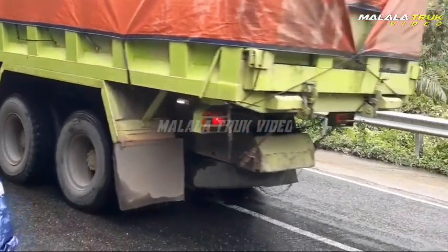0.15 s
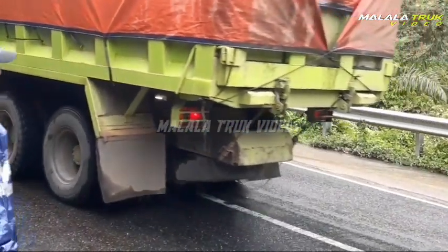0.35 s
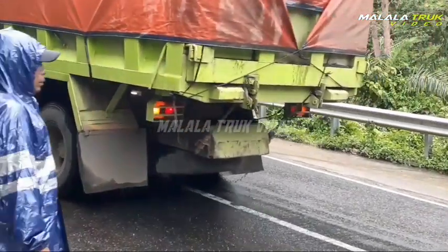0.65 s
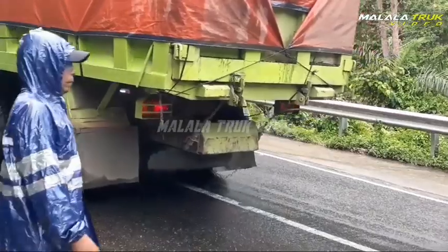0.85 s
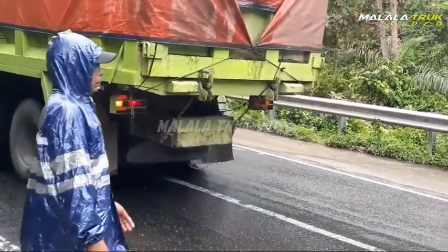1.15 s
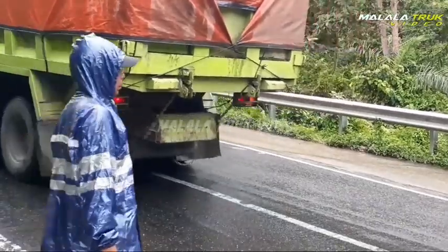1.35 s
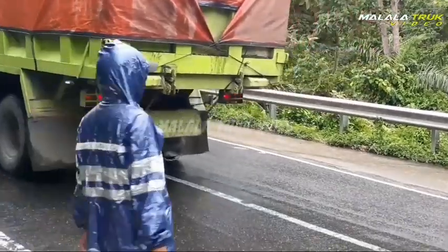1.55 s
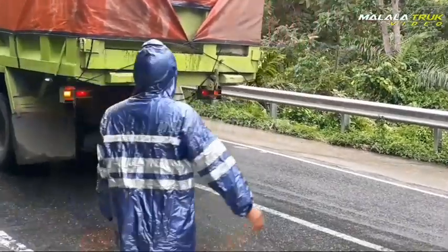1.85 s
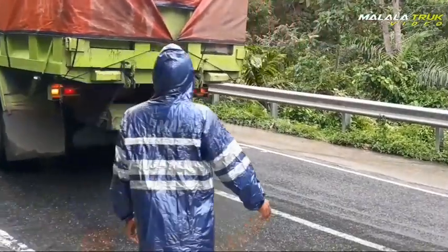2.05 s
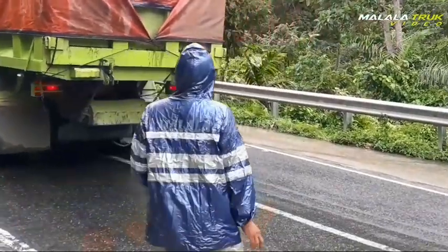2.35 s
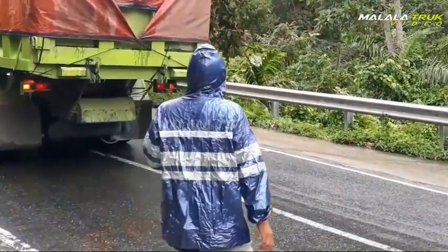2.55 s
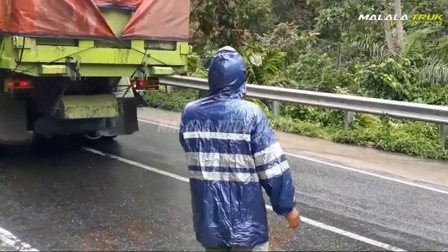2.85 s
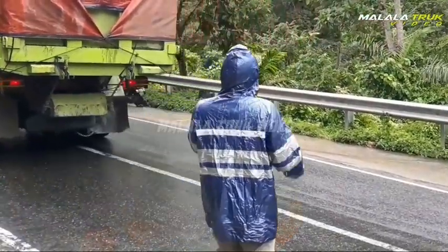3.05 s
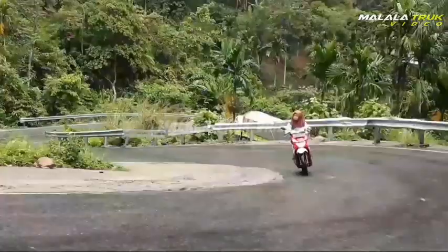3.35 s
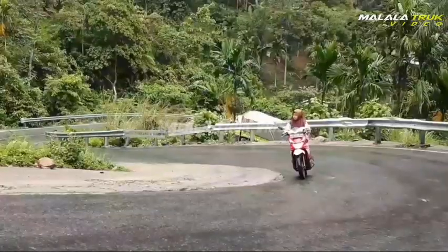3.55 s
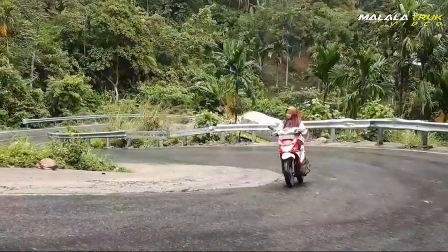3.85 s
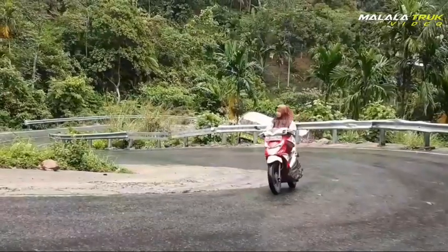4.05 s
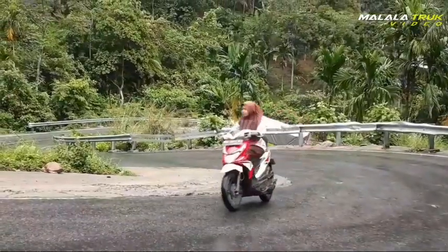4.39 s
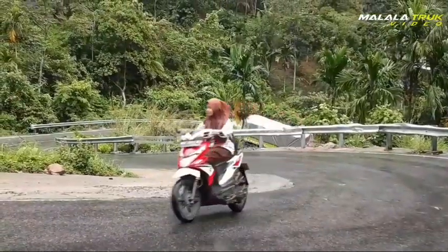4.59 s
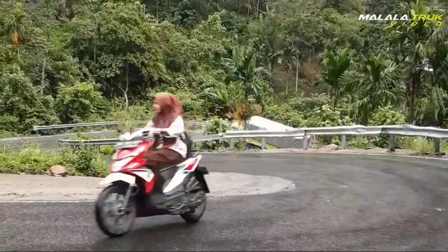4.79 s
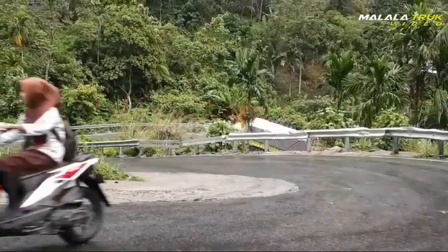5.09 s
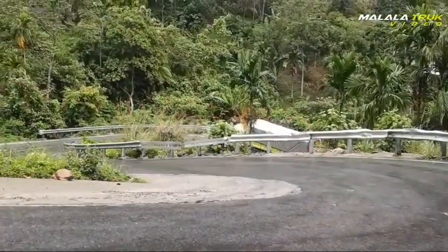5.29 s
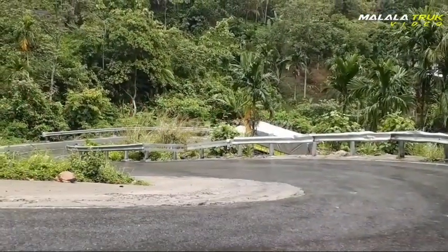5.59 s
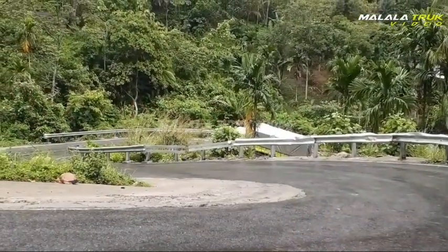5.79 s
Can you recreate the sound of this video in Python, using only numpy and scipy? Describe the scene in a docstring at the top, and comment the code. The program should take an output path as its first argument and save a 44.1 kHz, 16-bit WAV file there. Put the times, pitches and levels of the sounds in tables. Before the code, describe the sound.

Outdoors on a wet hill road, a heavy diesel truck grinds slowly away, close to a stereo microphone: deep steady boom, metallic clatter, wet tyre hiss and one short shrill squeal midway. The sound cuts abruptly to a much quieter scooter, puttering nearer with a soft hum, ticking and spray, passing very close near the end, while an insect rasps faintly in the bushes.

```python
"""Truck on a wet hill road, then a scooter

A loaded six-cylinder diesel truck grinds uphill close by: firing pulses, ringing panels, wet tyre hiss, one squeal.
The scene cuts abruptly to a single-cylinder scooter that rounds the bend and passes within a metre and a half:
exhaust pulses shaped by a silencer, cyclic knocks, spray and a wheel hiss that falls in pitch.
An insect throbs in the bushes. Two microphones stand about a hand's length apart."""
import sys
import numpy as np
from scipy import signal
from scipy.fft import rfft, irfft
from scipy.io import wavfile
from scipy.ndimage import map_coordinates

SR = 44100
rng = np.random.default_rng(int(sys.argv[2]) if len(sys.argv) > 2 else 0)


def int16_out(signal):
    """Quantize to a 16-bit WAV file."""
    q = np.round(np.clip(np.atleast_2d(signal).T, -1, 1) * 32767)
    wavfile.write(sys.argv[1], SR, q.astype(np.int16))


N = 261506
T = np.arange(N) / SR
HZ = np.fft.rfftfreq(N, 1 / SR)
CUT_S = 3.328  # the truck gives way to the scooter
EDGE_HZ = 15550  # upper band limit of the recorder

# truck speed, slowly gaining: (time [s], firing rate [1/s])
TRUCK_FIRING = [(0, 81.3), (0.42, 82.2), (0.83, 81.9), (1.45, 83.5), (1.66, 83.15), (2.7, 85.2),
                (2.9, 84.6), (3.32, 86.1)]
# the truck crawls away along its lane; its tailpipe was abreast of the microphones a moment earlier
TRUCK_LANE_M, TRUCK_AHEAD_M, TRUCK_M_PER_S = 4.26, 0.64, 2.1
# the boom as heard from abreast; growl and wet tyres fill the road evenly
BOOM_DB, GROWL_DB, HISS_DB = -16.5, -27.5, -33
GROWL_PER_LOAD = 0.27  # dB of growl for each dB of clatter
# the gas puffs are stronger while the tailpipe is still abreast
PUFFS_NEAR_DB, PUFFS_NEAR_S = 2.5, 0.39
# engine load: (time [s], relative clatter level [dB])
LOAD = [(0, -27.5), (0.85, -27), (1.2, -28.5), (2.1, -28), (3.05, -27), (3.3, -28)]
# overtones of the exhaust pulse:
# (multiple of the firing rate, relative level near [dB], relative level further up the hill [dB])
EXHAUST_OVERTONES = [(2, 1.5, 0), (3, -2, -2), (4, -3, -8), (5, -10, -20), (6, -11, -13), (7, -13, -20)]
OVERTONES_DB, OCTAVE_FLIP_S, OCTAVE_FLIP_LENGTH_S = -35, 1.79, 0.29
# growl of the unequal cylinders:
# (multiple of the full engine cycle, relative level near [dB], relative level further up the hill [dB])
CYCLE_ORDERS = [(8, -14, -5), (9, -1, 1), (10, 0, 1), (11, -11, -3), (13, 2, -4), (14, 0.5, 2),
                (15, -7, -3), (16, -3, -8), (19, -9, -7), (20, -8, -5), (23, -6, -12), (25, -4, -11),
                (26, -7, -5), (27, -9, -13), (28, -5, -12), (29, -8, -12)]
# colour of the gas puffs: (frequency [Hz], relative density [dB per Hz])
PUFF_SPECTRUM = [(20, -18), (45, -17), (80, -8), (115, -10.5), (175, -4), (250, -5.5), (300, -10.5),
                 (390, -9.5), (440, -18), (700, -37.5)]
# colour of the engine block: (frequency [Hz], relative density [dB per Hz])
BLOCK_SPECTRUM = [(300, -67), (450, -24), (510, -11), (600, -7.5), (800, -5), (1080, -11), (1700, -8.5),
                  (2400, -8.5), (3100, -20.5), (4400, -36), (8000, -52)]
# ringing engine and body panels:
# (frequency [Hz], width [Hz], relative level near [dB], relative level further up the hill [dB])
PANELS = [(748, 70, -1.5, -1.5), (900, 45, -5.5, -6), (1270, 81, -27, -8), (1452, 96, -8, -6),
          (1977, 94, -8, -8)]
PANEL_TURN_S, PANEL_TURN_LENGTH_S = 2.25, .1
# short wavering tones in the truck's clatter: (time [s], length [s], frequency [Hz], relative level [dB])
CLATTER_TONES = [(0.03, .07, 2002, -41), (0.05, .06, 645, -35), (0.06, .06, 721, -34.5),
                 (0.26, .05, 861, -35.5), (0.39, .08, 818, -34), (0.42, .1, 1440, -42),
                 (0.52, .05, 694, -34.5), (0.63, .04, 2040, -40), (0.86, .08, 2010, -40.5),
                 (0.91, .05, 694, -35), (1.01, .05, 769, -34), (1.35, .11, 775, -33.5),
                 (1.54, .04, 775, -34), (1.68, .06, 775, -34), (1.87, .07, 1431, -40),
                 (2.1, .15, 748, -36.5), (2.55, .06, 850, -36), (2.68, .06, 1469, -37.5),
                 (2.75, .06, 1400, -37.5), (2.78, .05, 737, -35), (2.85, .06, 865, -33.5),
                 (2.98, .06, 1475, -37.5), (3.05, .04, 2018, -33.5), (3.06, .04, 1308, -38),
                 (3.09, .05, 839, -34.5)]
TONE_WANDER, TONES_DB = .008, -0.5  # share of the pitch; level of all tones together
# the gears whine faintly near ten times the firing rate, and swell as the truck pulls away
WHINE_DB, WHINE_TOP_DB, WHINE_SWELL_S = -39.5, -25, 0.053
# colour of the truck's wet tyres: (frequency [Hz], relative density [dB per Hz])
TYRE_SPECTRUM = [(1500, -6.5), (3200, 0.5), (4300, 1.5), (5500, 0.5), (6400, -7), (7400, -10), (8700, -3.5),
                 (10300, -8), (11700, -6.5), (14000, -16), (15500, -17)]
# main, lower and upper tone of the squeal: (frequency [Hz], flutter [dB])
SQUEAL_TONES = [(3393, .6), (3017, 1.5), (3785, 1.2)]
# the squeal creeps upward: (time [s], shift [share of the pitch])
SQUEAL_BEND = [(1.52, -.007), (1.58, -.001), (1.68, .001), (1.76, .005)]
# the squeal catches, sounds fully twice, then trails off: (start [s], hold [s], main tone level [dB],
# lower tone level [dB], upper tone level [dB], scrape level [dB])
SQUEAL_CATCHES = [(1.526, .014, -38.5, -46, -50, -43), (1.55, .022, -37, -41, -38, -52),
                  (1.568, .024, -28, -47, -42.5, -52), (1.6, .06, -31.5, -51, -56, -52),
                  (1.664, .032, -27.5, -40, -40.5, -42), (1.7, .016, -37, -45, -38.5, -42),
                  (1.72, .042, -45, -49, -41.5, -56), (1.768, .01, -45, -43, -54, -60),
                  (1.785, .06, -47, -60, -58, -54)]
SCRAPE_HZ, SCRAPE_WIDTH_HZ = 3640, 190
SQUEAL_RISE_DB_PER_S, SQUEAL_FALL_DB_PER_S = 1300, 600

# scooter speed: (time [s], firing rate [1/s])
SCOOTER_FIRING = [(3.34, 37), (3.55, 37.25), (3.71, 38.6), (3.82, 39.05), (4.03, 39.5), (4.26, 38.15),
                  (4.86, 37.2), (5.13, 36.9), (5.48, 38.3), (5.76, 38.45), (5.93, 38.1)]
# when and how near the scooter passes, and how fast
PASS_S, PASS_M, SCOOTER_M_PER_S = 5.474, 1.33, 4.98
# it swings out to the left, so that the left microphone hears its exhaust first; it also turns its rear
LEFT_S, LEFT_SWING_S, LEFT_LEAD_MS = 5.46, 0.08, 0.32
REAR_S, REAR_TURN_S = 5.35, 0.13
# parts of the scooter by name:
# (level at the nearest point [dB], share of the distance loss that applies, gain from behind [dB])
SCOOTER_PARTS = {"clatter": (-29, 0.41, 1), "spray": (-33.5, 0.91, -1.3), "ticks": (-51.5, 0.2, 12.5),
                 "wheel": (-41.5, 0.8, -0.54)}
# exhaust hum, which fades and returns along the bend: (time [s], level [dB])
HUM_LEVEL = [(3.34, -30), (3.54, -32.5), (3.84, -25.5), (3.93, -29.5), (3.98, -45), (4.0, -33),
             (4.07, -25.5), (4.43, -34), (4.49, -37), (4.56, -47), (4.61, -32.5), (4.78, -44), (4.98, -39),
             (5.04, -33), (5.18, -24.5), (5.45, -29), (5.54, -34), (5.93, -29.5)]
# when the scooter is seen far off, head on, alongside and from behind: four times [s]
VIEW_S = (3.8, 4.65, 5.25, 5.65)
# silencer response: (multiple of the firing rate, relative level far off [dB], head on [dB],
# alongside [dB], from behind [dB])
SILENCER = [(3, -46, -48, -41, -39), (4, -45, -41.5, -38, -34.5), (5, -44, -41, -42, -35),
            (6, -39.5, -41.5, -34.5, -31.5), (7, -42, -39.5, -40, -47), (8, -47, -42, -46, -44),
            (9, -52, -54, -53, -45), (10, -51, -54, -46, -38), (11, -56, -52, -62, -46),
            (12, -57, -57, -55, -56), (13, -52, -52, -53, -62), (15, -56, -59, -57, -52),
            (16, -56, -51, -50, -55), (17, -54, -58, -54, -50), (18, -54, -51, -43, -46),
            (19, -62, -53, -52, -54), (20, -52, -60, -55, -55), (21, -54, -59, -52, -64),
            (22, -57, -54, -53, -50), (23, -52, -54, -59, -66), (24, -62, -59, -57, -52),
            (26, -61, -57, -65, -55), (28, -66, -55, -56, -60)]
ORDER_WAVER_DB = 1.0
PULSES_DB, PULSE_LEAD = 0.4, 0.056  # the pulse leads the cycle by this share
# knocks of exhaust, valves and piston: (place [cycles], rise [cycles], strength in the clatter,
# strength in the whirr, strength in the ticks)
KNOCKS = [(.06, .06, 1, .25, 1), (.22, .04, .25, .2, .35), (.44, .04, .15, .3, .1), (.71, .04, .7, 1, .4),
          (.88, .05, .6, .9, .1)]
# clatter from the front: (frequency [Hz], relative density [dB per Hz])
FRONT_SPECTRUM = [(25, -25), (60, -1.5), (150, 1), (230, -3), (340, -1), (460, -13.5), (670, -11),
                  (850, -8.5), (1080, -11), (1300, -13.5), (1600, -11), (2000, -14), (2300, -12.5),
                  (2850, -17.5), (3600, -24), (7000, -41.5)]
# clatter from behind: (frequency [Hz], relative density [dB per Hz])
REAR_SPECTRUM = [(25, -12), (60, -7), (170, -8), (270, -2), (340, 8.5), (400, 7), (490, -10), (670, 2.5),
                 (850, -4), (1370, -4), (1510, 5), (1680, -2), (2400, -2.5), (3000, -14), (7000, -48)]
# hollow resonances of intake and drive case: (frequency [Hz], width [Hz], relative level [dB])
CASE_RESONANCES = [(654, 130, -3), (1000, 110, -20), (1790, 98, -9.5), (2400, 220, -10), (3154, 31, -9)]
# case resonances of the hollow drone: (frequency [Hz], width [Hz], relative level [dB])
DRONE_RESONANCES = [(660, 52, -4), (1064, 60, 12)]
DRONE_S, DRONE_LENGTH_S, DRONE_DB = 4.93, 0.35, -45.5  # it swells as the scooter draws near
# the drive's whirr is faint from the front, then opens up and rises alongside:
# (time [s], frequency [Hz], level [dB])
WHIRR = [(3.34, 1730, -48.5), (3.8, 1730, -44.5), (4.4, 1700, -48), (5.1, 1660, -43.5), (5.19, 1670, -36.5),
         (5.35, 1780, -35), (5.5, 1940, -32), (5.68, 2120, -33), (5.93, 2070, -33)]
WHIRR_FRONT_WIDTH_HZ, WHIRR_REAR_WIDTH_HZ = 180, 660
# colour of the ticks: (frequency [Hz], relative density [dB per Hz])
TICK_SPECTRUM = [(1500, -10), (5000, -15.5), (7300, -12.5), (9500, -9.5), (15000, -19)]
# sharper single ticks: (time [s], relative level [dB])
CLACKS = [(4.446, -28), (4.9545, -27), (5.1437, -26), (5.198, -25), (5.3587, -19), (5.385, -19),
          (5.4884, -24), (5.7733, -24), (5.906, -20)]
# colour of the scooter's spray: (frequency [Hz], relative density [dB per Hz])
SPRAY_SPECTRUM = [(2000, -3), (3500, 4), (4600, 0.5), (5600, 2), (6400, -7), (7200, -9), (8500, 0.5),
                  (10200, -7.5), (11500, 1), (13500, -8.5), (15500, -14)]
# wheel hiss going by: (frequency coming [Hz], frequency going [Hz], midpoint [s], glide [s])
WHEEL_GLIDE = (5760, 4330, 5.44, .11)
SWISH_S, SWISH_LENGTH_S, SWISH_DB = 4.68, 0.049, -41  # one brief swish of the tyre
# the wheel hiss has a thin octave for a moment, while the scooter is still coming
OCTAVE_FROM_S, OCTAVE_TO_S, OCTAVE_DB = 4.1, 4.64, -53

# likeness of the two microphones for scattered sound: (frequency [Hz], likeness [-1 to 1])
MIC_LIKENESS = [(60, 0.39), (130, 1), (290, 0.93), (640, 0.93), (1000, 0.86), (1410, 0.17), (3100, -0.15),
                (15000, 0.042)]


def truck():
    """Exhaust and knock share one crankshaft; the guard rail throws clatter and tyre hiss back."""
    firings = np.cumsum(curves(TRUCK_FIRING)[0] * (1 + .0015 * drift(14))) / SR
    distance_m = np.hypot(TRUCK_LANE_M, TRUCK_AHEAD_M + TRUCK_M_PER_S * T)
    boom_db = BOOM_DB - 20 * np.log10(distance_m / TRUCK_LANE_M)
    clatter_db, = curves(LOAD)
    growl_db = GROWL_DB + GROWL_PER_LOAD * (clatter_db - clatter_db.mean())
    tyres = wet_tyres(TYRE_SPECTRUM, HISS_DB + 0.8 * drift(25), drops_db=-9.5, grain_db=3.5)
    bright = truck_clatter(firings, clatter_db) + clatter_tones(firings) + tyres
    bright = sweep_echo(bright, start_ms=9.6, end_ms=10.6, echo_db=-12.5)
    return truck_exhaust(firings, boom_db, growl_db) + bright + squeal()


def truck_exhaust(firings, boom_db, growl_db):
    """Regular firing pulses, a lumpy growl from unequal cylinders, and puffs of gas."""
    cycle = firings / 6  # six firings make one full engine cycle
    away = np.clip((T - 1.1) / 1.1, 0, 1)
    orders = 0
    for k, near, far in CYCLE_ORDERS:
        level = amp(near + (far - near) * away + 3.1 * drift(3.2))
        phase = rng.random() + 0.048 * drift(11.0)
        orders = orders + level * np.cos(2 * np.pi * (k * cycle + phase))
    puffs = scatter(white() * bursts(firings, length=0.96, base=0.6), amp(read(PUFF_SPECTRUM)))
    puffs_db = -2.5 + PUFFS_NEAR_DB * swell(0, PUFFS_NEAR_S)
    growl = amp(-3.0) * arrive(unit(orders), lead_ms=0.4) + amp(puffs_db) * puffs
    return truck_pulses(firings, boom_db, away) * pan(2.34) + amp(growl_db) * growl * pan(1.1)


def truck_pulses(firings, boom_db, away):
    """One sharp pressure dip a firing: boom and overtones; the octave turns over as the truck draws away."""
    boom = amp(boom_db) * np.cos(2 * np.pi * firings) * (1 + 0.025 * drift(22))
    flip = 1 - 2 * turn(OCTAVE_FLIP_S, OCTAVE_FLIP_LENGTH_S)
    overtones = 0
    for k, near, far in EXHAUST_OVERTONES:
        level = amp(near + (far - near) * away + 1.9 * drift(4.8))
        sign = flip if k == 2 else 1
        overtones = overtones + level * sign * np.cos(2 * np.pi * k * firings)
    return -np.sqrt(2) * (boom + amp(OVERTONES_DB) * overtones)


def truck_clatter(firings, level_db):
    """Combustion knock, shallowly pulsed at the firing rate, coloured by block and panels; the gears whine."""
    force = amp(0.35 * rng.standard_normal(N)[firings.astype(int)])  # one draw per firing
    knock = cyclic_noise(firings / 6, repeat=0.36) * bursts(firings, length=0.12, base=2.1) * force
    away = turn(PANEL_TURN_S, PANEL_TURN_LENGTH_S)
    rung = 0
    for i, share in enumerate((1 - away, away)):  # near, then further up the hill
        panels = ringing([(hz, width, dbs[i]) for hz, width, *dbs in PANELS])
        power = amp(read(BLOCK_SPECTRUM)) ** 2 + amp(3) * panels
        rung = rung + share * scatter(knock, np.sqrt(power), direct=0.26, lead_ms=0.32)
    shade = pan(read([(700, 0.99), (1300, 7.5), (3000, 2.8)]))  # the side balance varies with frequency
    clatter = irfft(rfft(rung) * shade, N)
    rise = np.exp(np.minimum(T - CUT_S, 0) / WHINE_SWELL_S)
    whine_hz = 9.8 * curves(TRUCK_FIRING)[0]
    whine = (amp(WHINE_DB) + amp(WHINE_TOP_DB) * rise) * band(whine_hz, width_hz=46)
    return amp(level_db + 1.28) * clatter + arrive(whine, lead_ms=0.11) * pan(3.3)


def clatter_tones(firings):
    """Brief wavering tones that swell and fade within the clatter, pulsing at the firing rate."""
    pulse = bursts(firings, length=0.19, base=0.97)
    tones = 0
    for s, length, hz, db in CLATTER_TONES:
        pitch = hz * (1 + TONE_WANDER * drift(24))
        tones = tones + amp(db) * swell(s, length) * unit(np.sin(2 * np.pi * np.cumsum(pitch) / SR))
    return arrive(tones * pulse * amp(TONES_DB + 1.2 * drift(30)), lead_ms=0.11) * pan(3.5)


def wet_tyres(spectrum, level_db, drops_db, grain_db):
    """Water torn from the tread: a fine hiss with separate droplets in it."""
    fall = rng.random((2, N)) < 2500 / SR  # about 2500 droplets a second
    size = np.minimum(rng.exponential(1, (2, N)), 4)
    drops = white() * fall * amp(grain_db * size)
    hiss = scatter(white() + amp(drops_db) * unit(drops), amp(read(spectrum)))
    shade = pan(read([(4400, 3.5), (6000, 8.5), (8200, -1.0), (12000, 1.5)]))
    return amp(level_db) * irfft(rfft(hiss) * shade, N)


def squeal():
    """A shrill, unsteady friction tone with a side tone below and above; it scrapes where it catches."""
    sweep = np.cumsum(1 + curves(SQUEAL_BEND)[0] + 0.0016 * drift(60)) / SR
    voices = []
    for hz, flutter_db in SQUEAL_TONES:
        voices.append(amp(flutter_db * drift(50)) * unit(np.sin(2 * np.pi * hz * sweep)))
    voices.append(band(SCRAPE_HZ, SCRAPE_WIDTH_HZ))
    out = 0
    for i, voice in enumerate(voices):
        catches = [amp(dbs[i]) * squeal_envelope(s, hold) for s, hold, *dbs in SQUEAL_CATCHES]
        out = out + voice * np.max(catches, axis=0)
    return roadside(out * pan(2.5), wet_db=-20, t60=.4)


def squeal_envelope(start_s, hold_s):
    """A quick rise, a hold and a quick fall."""
    t = T - start_s
    return amp(SQUEAL_RISE_DB_PER_S * np.minimum(t, 0) - SQUEAL_FALL_DB_PER_S * np.maximum(t - hold_s, 0))


def sweep_echo(x, start_ms, end_ms, echo_db):
    """One hard reflection whose extra path changes steadily as the truck moves: a drifting comb."""
    delay = np.interp(T, [0, CUT_S], [start_ms, end_ms]) * SR / 1000  # in samples
    echo = np.array([map_coordinates(side, [np.arange(N) - delay], order=3) for side in x])
    return (x + amp(echo_db) * echo) / np.hypot(1, amp(echo_db))


def scooter():
    """Clatter, ticks, spray and wheel hiss follow distance and turn to the rear; the insect sits behind."""
    firings = np.cumsum(curves(SCOOTER_FIRING)[0] * (1 + .0025 * drift(30))) / SR
    loss_db = 20 * np.log10(np.hypot(1, SCOOTER_M_PER_S * (T - PASS_S) / PASS_M))
    behind = turn(REAR_S, REAR_TURN_S)
    level = {}
    for part, (db, share, rear_db) in SCOOTER_PARTS.items():
        level[part] = db - share * loss_db + rear_db * behind
    exhaust = scooter_exhaust(firings)
    engine = scooter_engine(firings, behind, level["clatter"])
    tick_noise = white() * knocks(firings, column=2, base=.1, uneven_db=3.5)
    ticks = roadside(amp(level["ticks"]) * scatter(tick_noise, amp(read(TICK_SPECTRUM))), wet_db=4.5, t60=0.25)
    spray = wet_tyres(SPRAY_SPECTRUM, level["spray"] + .5 * drift(26), drops_db=-1.5, grain_db=0.5)
    spray = spray * knocks(firings, column=2, base=1.7, uneven_db=5.0)
    passing = exhaust + engine + ticks + clacks(level_db=-5, decay_s=0.0035) + spray
    return passing + wheel_hiss(level["wheel"]) + insect(chirps_per_s=8.0, first_s=3.395, level_db=-52.5)


def scooter_exhaust(firings):
    """Silencer pulses and a hum at twice the firing rate, reaching the left microphone first at the pass."""
    lead_ms = LEFT_LEAD_MS * turn(LEFT_S, LEFT_SWING_S)
    hum = -amp(curves(HUM_LEVEL)[0]) * unit(np.cos(2 * np.pi * 2 * firings))
    pulses = silencer_pulses(firings) * amp(PULSES_DB + 0.53 * drift(25))
    return arrive(pulses + hum, lead_ms) * pan(1.0)


def silencer_pulses(firings, smear=0.02995):
    """One pulse a firing, rung and smeared by the silencer, whose orders shift as the scooter turns."""
    orders, *views = np.transpose(SILENCER)
    k = np.arange(46)
    log_gain = np.log(amp(np.interp(k, orders, np.mean(views, axis=0), left=-70)))
    # minimum phase of the mean response, then a smear that grows with the order
    phase = -signal.hilbert(np.r_[log_gain, log_gain[-2:0:-1]]).imag[:len(k)] - smear * k ** 2
    phase += (k > 10) * rng.uniform(-np.pi, np.pi, len(k))  # high orders come by many paths
    pulses = 0
    for i, *dbs in SILENCER:  # the second order is left to the hum
        level = amp(np.interp(T, VIEW_S, dbs) + ORDER_WAVER_DB * drift(2.9))
        pulses = pulses + level * np.cos(2 * np.pi * i * (firings + PULSE_LEAD) + phase[i])
    return -np.sqrt(2) * pulses


def scooter_engine(firings, behind, level_db):
    """Clatter at the firing rate, coloured by front and rear, with a hollow drone and a rising whirr."""
    rattle = cyclic_noise(firings, repeat=0.42) * knocks(firings, column=0, base=1.5, uneven_db=1.3)
    front_gain = np.sqrt(amp(read(FRONT_SPECTRUM)) ** 2 + ringing(CASE_RESONANCES))
    front = scatter(rattle, front_gain, direct=0.62, lead_ms=0.089)
    rear = scatter(rattle, amp(read(REAR_SPECTRUM)), direct=0.87, lead_ms=0.33)
    drone = scatter(rattle, np.sqrt(ringing(DRONE_RESONANCES)), direct=.6, lead_ms=0.073)
    drone = amp(DRONE_DB) * swell(DRONE_S, DRONE_LENGTH_S) * drone
    clatter = amp(level_db) * ((1 - behind) * front + behind * rear)
    return (clatter + drone + whirr(firings, behind)) * pan(4.0 + 3.5 * behind)


def whirr(firings, behind):
    """The drive chatters at every firing in one resonance, narrow in front, broad and gritty behind."""
    hz, level_db = curves(WHIRR)
    chatter = cyclic_noise(firings, repeat=0.5)[0] * knocks(firings, column=1, base=.25, uneven_db=1.6)
    grit = white()[0] * knocks(firings, column=0, base=.9, uneven_db=1.3)
    narrow = arrive(resonate(chatter, hz, WHIRR_FRONT_WIDTH_HZ), lead_ms=.08)
    broad = arrive(resonate(grit, hz, WHIRR_REAR_WIDTH_HZ), lead_ms=.41)
    return amp(level_db) * (np.sqrt(1 - behind) * narrow + np.sqrt(behind) * broad)


def knocks(firings, column, base, uneven_db):
    """An envelope of the knocks within each engine cycle, never twice equally hard."""
    total = abs(base)
    for place, length, *strengths in KNOCKS:
        turns = firings - place + 1
        force = amp(uneven_db * rng.standard_normal(int(turns[-1]) + 2)[turns.astype(int)])
        rises = turns % 1 / length  # time since the knock, in rise times
        total = total + strengths[column] * force * rises * np.exp(1 - rises)
    return unit(total)


def clacks(level_db, decay_s):
    """A few sharp, bright ticks from the passing scooter."""
    gain = sum(amp(db) * (T >= s) * np.exp(-abs(T - s) / decay_s) for s, db in CLACKS)
    return amp(level_db) * gain * scatter(white(), amp(read(TICK_SPECTRUM)))


def wheel_hiss(level_db):
    """A thin tyre hiss that falls in pitch as the scooter goes by."""
    hz = glide(*WHEEL_GLIDE)
    gain = np.hypot(amp(level_db), amp(SWISH_DB) * swell(SWISH_S, SWISH_LENGTH_S))
    hiss = gain * np.array([band(hz, width_hz=1300) for _ in range(2)]) * pan(11.4)
    octave = amp(OCTAVE_DB) * (turn(OCTAVE_FROM_S, 0.027) - turn(OCTAVE_TO_S, .04))
    return hiss + octave * np.array([band(2 * hz, width_hz=610) for _ in range(2)])


def insect(chirps_per_s, first_s, level_db):
    """A high, throbbing rasp from the roadside bushes: narrow noise opened by a regular throb."""
    throb = np.maximum(0.9 + np.cos(2 * np.pi * chirps_per_s * (T - first_s)), 0) ** .5 * amp(drift(7.1))
    return amp(level_db) * unit(throb) * np.array([band(9450, width_hz=570), band(9450, width_hz=680)])


def roadside(x, wet_db, t60):
    """Adds scattered echoes from the bank and trees: sparse random taps dying away by 60 dB in t60 seconds."""
    t = T[:SR // 2]
    sparse = rng.random((2, len(t))) < .05
    taps = rng.standard_normal((2, len(t))) * sparse * amp(-60 * t / t60) * (t > .008)
    tail = signal.fftconvolve(x, taps / np.linalg.norm(taps[0]), axes=1)[:, :N]
    return x + amp(wet_db) * tail


def scatter(pair, gain, direct=0, lead_ms=0):
    """Colours two signals as two close microphones hear them: a direct share reaches the left first."""
    a, b = rfft(pair)
    direct = np.clip(direct, 0, 1)
    diffuse = np.clip(read(MIC_LIKENESS), -1, 1)
    same = (1 - direct) * diffuse + direct * np.exp(2j * np.pi * HZ * lead_ms / 1000)
    left = same * a + np.sqrt(np.maximum(1 - abs(same) ** 2, 0)) * b
    return unit(irfft(np.array([left, a]) * gain, N))


def pan(right_db):
    """Gains of the left and right microphone, the right one louder by right_db."""
    return amp(np.array([[-.5], [.5]]) * right_db)


def arrive(x, lead_ms):
    """A direct sound that reaches the right microphone later."""
    return np.array([x, np.interp(T - lead_ms / 1000, T, x)])


def cyclic_noise(cycle, repeat):
    """Noise of which a share comes back alike in every engine cycle."""
    since = np.arange(N) - np.searchsorted(cycle, np.floor(cycle))  # samples since the cycle began
    repeat = np.clip(repeat, 0, 1)
    return np.sqrt(repeat) * white()[:, since] + np.sqrt(1 - repeat) * white()


def bursts(turns, length, base):
    """An envelope that jumps at every whole turn and dies away to a base."""
    return unit(abs(base) + np.exp(-(turns % 1) / abs(length)))


def band(centre_hz, width_hz):
    """Noise in one resonance that can move."""
    angle = 2 * np.pi * np.cumsum(centre_hz * np.ones(N)) / SR
    return unit(drift(width_hz) * np.cos(angle) + drift(width_hz) * np.sin(angle))


def resonate(x, hz, width_hz):
    """Passes x through a steep resonance that follows the curve hz."""
    spin = np.exp(2j * np.pi * np.cumsum(hz * np.ones(N)) / SR)
    r = np.exp(-np.pi * abs(width_hz) / SR)
    # shift down to zero frequency, low-pass, shift back up
    low = signal.lfilter([(1 - r) ** 2], [1, -2 * r, r * r], x / spin)
    return unit((spin * low).real)


def ringing(modes):
    """Power response of a few resonances."""
    return sum(amp(db) ** 2 / (1 + ((HZ - hz) / width) ** 2) ** 2 for hz, width, db in modes)


def turn(mid_s, width_s):
    """A smooth change from 0 to 1."""
    return .5 + .5 * np.tanh((T - mid_s) / (2 * width_s))


def glide(from_hz, to_hz, mid_s, width_s):
    """A frequency that slides from one value to another."""
    return from_hz + (to_hz - from_hz) * turn(mid_s, width_s)


def swell(at_s, length_s):
    """A smooth rise and fall with a top of 1."""
    return np.exp(-((T - at_s) / length_s) ** 2)


def drift(hz):
    """Random wander of unit size, mostly below the given rate."""
    return unit(irfft(rfft(rng.standard_normal(N)) * np.exp(-(HZ / hz) ** 2), N))


def white():
    """Two unrelated channels of white noise."""
    return rng.standard_normal((2, N))


def curves(rows):
    """Each column of a table as a value per sample."""
    s, *columns = np.transpose(rows)
    return [np.interp(T, s, c) for c in columns]


def read(points, hz=HZ):
    """A table read on a logarithmic frequency axis."""
    f, value = np.transpose(points)
    return np.interp(np.log(hz + 1), np.log(f + 1), value)


def amp(db):
    """Decibels to amplitude."""
    return 10 ** (np.asarray(db) / 20)


def unit(x):
    """Scales to a root mean square of 1."""
    return x / np.sqrt(np.mean(x ** 2) + 1e-20)


def scene():
    """The truck, then at once the scooter."""
    after = np.clip((T - CUT_S) / 0.0081 + .5, 0, 1)
    return (1 - after) * truck() + after * scooter()


def record(dry):
    """The recorder's band limit: a steep low-pass."""
    low_pass = signal.firwin(511, EDGE_HZ, window=("kaiser", 9), fs=SR)
    return signal.oaconvolve(dry, low_pass[None], "same")


dry = scene()
out = record(dry)
int16_out(out)
```